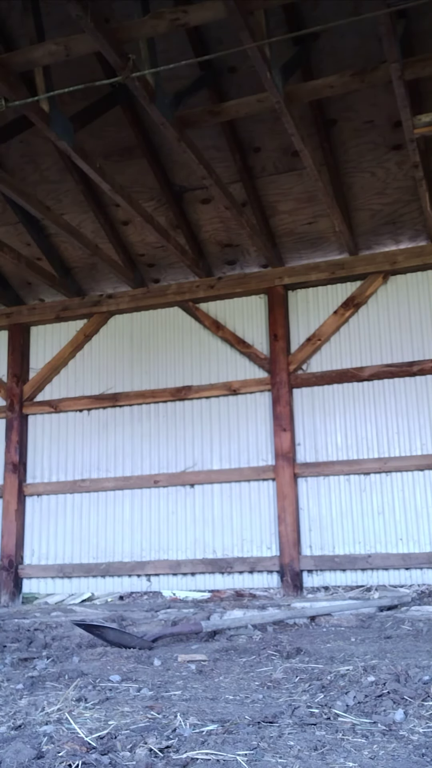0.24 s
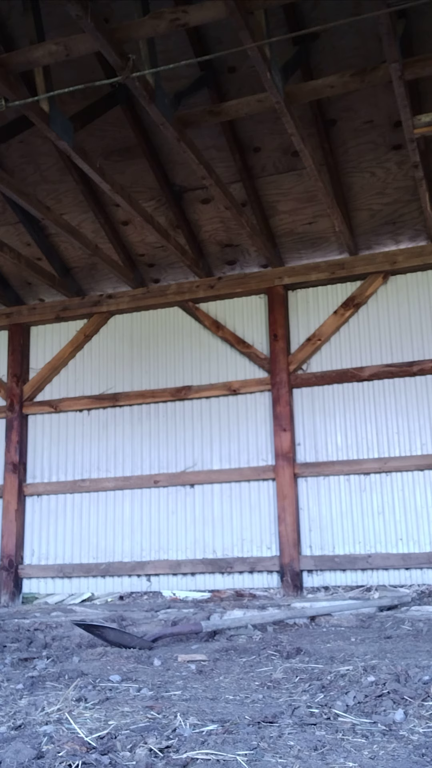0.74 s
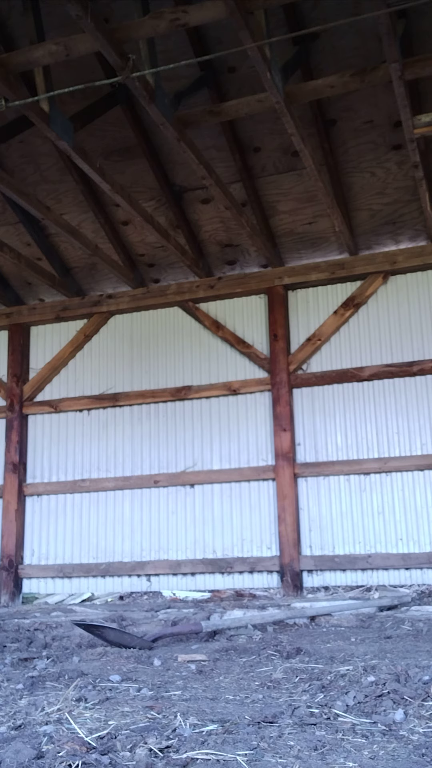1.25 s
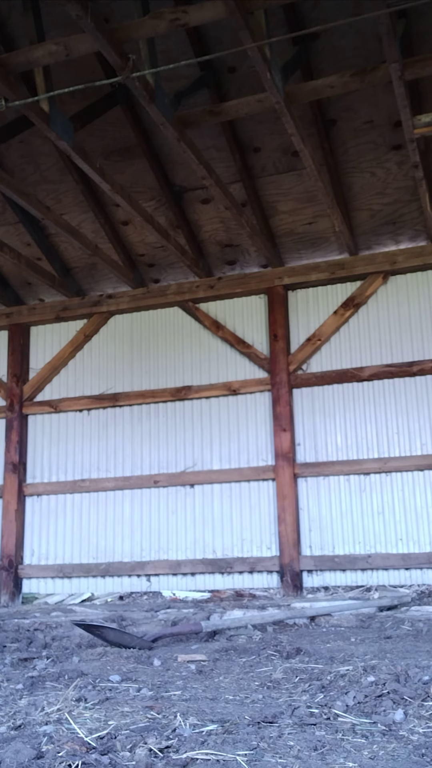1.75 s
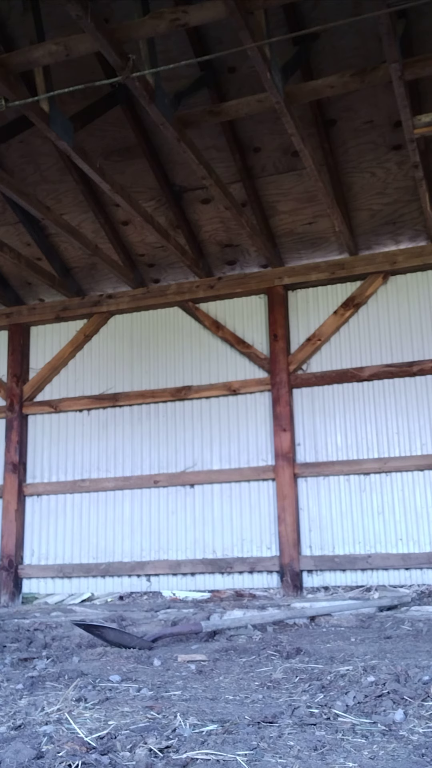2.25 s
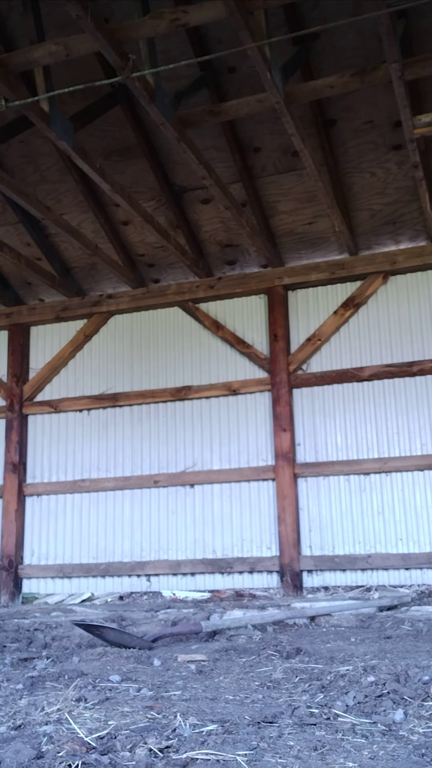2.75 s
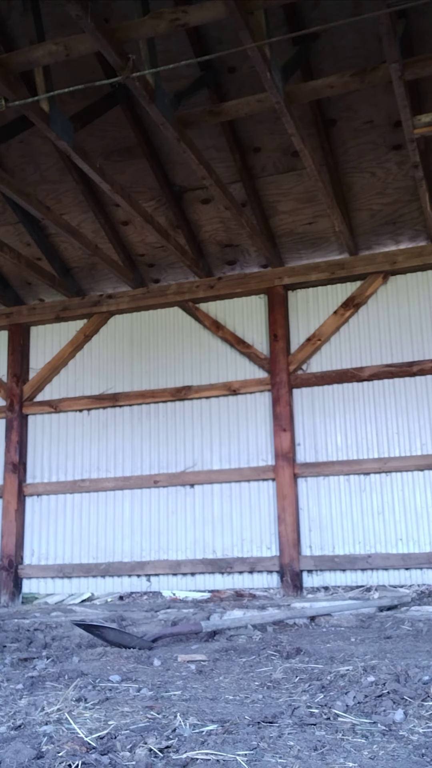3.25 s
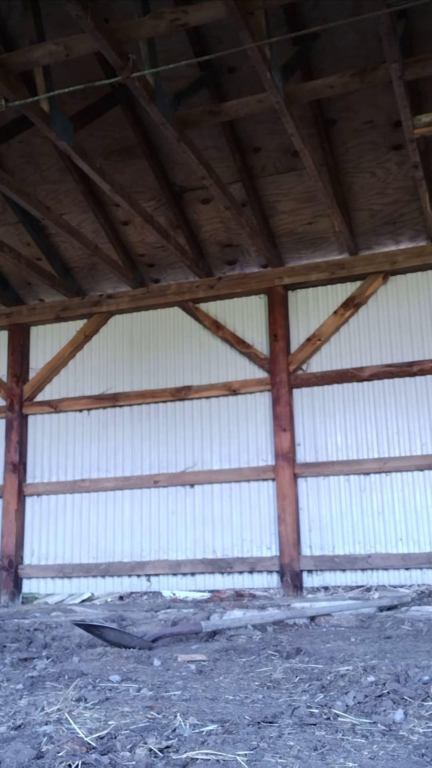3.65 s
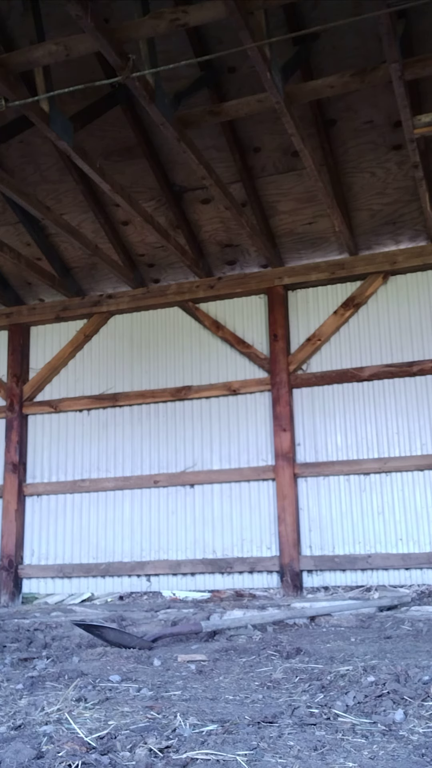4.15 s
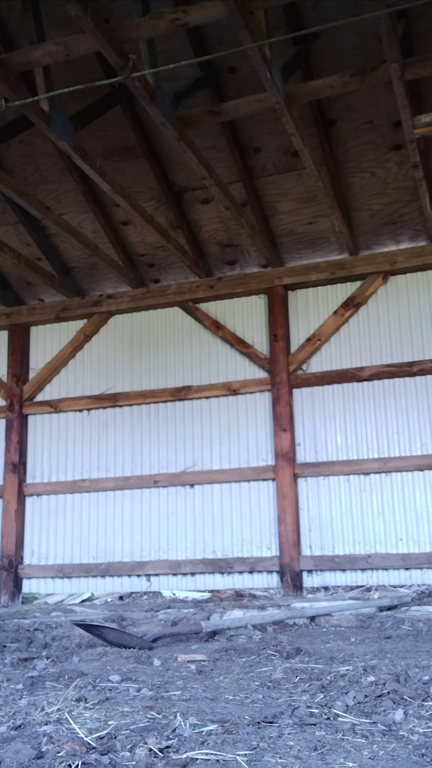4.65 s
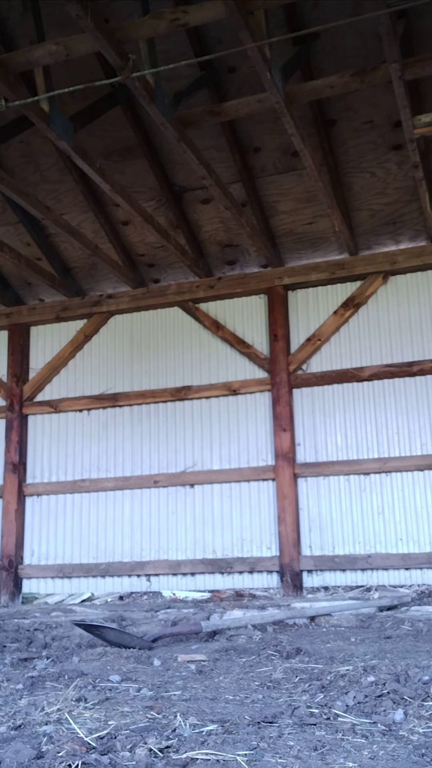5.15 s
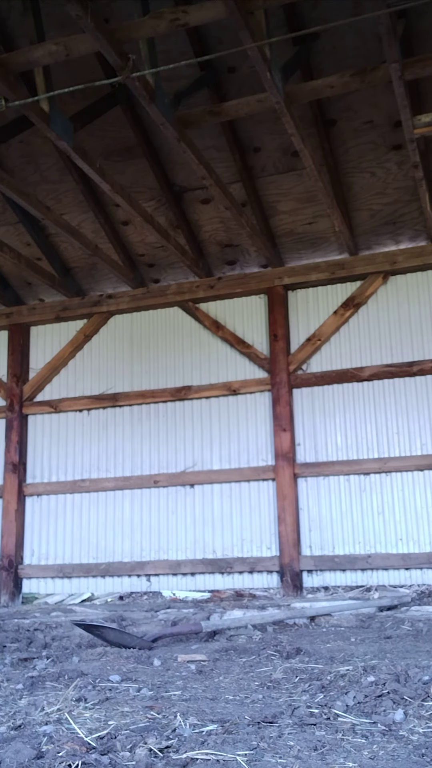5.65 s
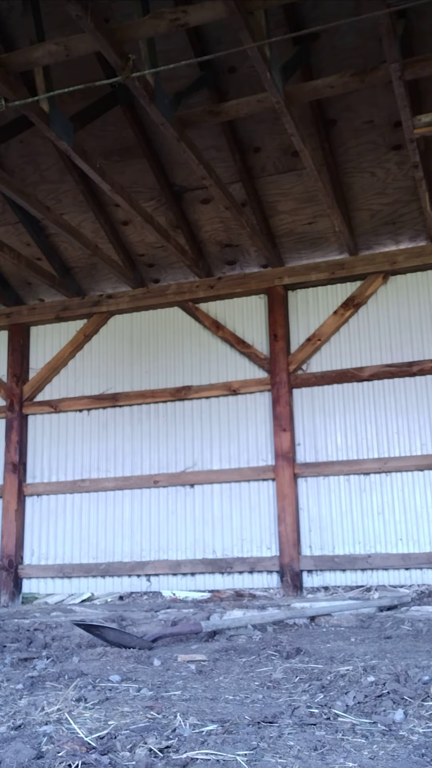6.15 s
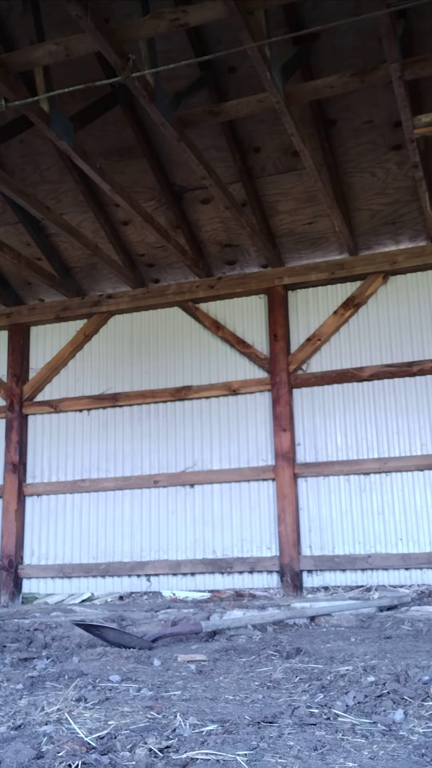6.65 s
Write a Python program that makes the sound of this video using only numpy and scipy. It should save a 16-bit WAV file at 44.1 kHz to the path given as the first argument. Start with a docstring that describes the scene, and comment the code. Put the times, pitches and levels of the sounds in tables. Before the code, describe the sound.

A quiet timber barn, heard through a close stereo microphone: very faint airy hiss, distant low rumble and a thin, steady insect trill. Clothing rustles softly at 0-0.4 s, with one faint high chirp near 0.15. At 1.2 s a hard, bright wooden clack hits the wall in a few quick contacts, with a low flex of the boards; at 1.43 s a duller, lower thud lands on dirt, with a faint fine rattle around it. Short woody echoes fade within about half a second. From 2 to 6.3 s a bird gives brief, gliding high chirps every 0.3-0.7 s, clearest around 4.6-5.5. Sleeve rustles are strongest near 4 and 4.7 s; tiny dry ticks snap at 3.2-4.2 and 6.2-6.6, and faint squeaks come at 4.55 and 5.1. At 6.6 s a heavier, louder, resonant bang shakes the boards, its reverberation cut off at 6.9.

```python
"""Knocks in a timber barn

A hard piece of wood clacks against the wall of a quiet barn and thuds to the dirt floor; about five
seconds later a heavier knock shakes the boards. Each blow is a few quick contacts that drive a broad
wooden body and ringing modes, with echoes off the near wall and roof made from fading noise.
A bird chirps with gliding tones, clothing rustles as shaped noise, and ticks, squeaks, a fine rattle,
insects, hissing air and a distant rumble fill in the quiet."""
import sys
import numpy as np
from scipy import signal
from scipy.fft import rfft, irfft, next_fast_len
from scipy.io import wavfile
from scipy.ndimage import uniform_filter1d, minimum_filter1d

SR = 44100
rng = np.random.default_rng(int(sys.argv[2]) if len(sys.argv) > 2 else 0)


def materialize(psi):
    """Save the field psi as 16-bit PCM at rate SR to the path in sys.argv[1].

    A 1-D psi becomes a single channel; in a 2-D psi each row is a channel.
    """
    bounded = np.clip(np.atleast_2d(psi).T, -1, 1)
    quanta = np.round(bounded * 32767).astype(np.int16)
    wavfile.write(sys.argv[1], SR, quanta)


N = 303849

# Still air and distant rumble, colour of the noise: (f/Hz, weight/dB)
AIR_COLOUR = [(30, -11), (250, -0.5), (500, 10.5), (1050, 11), (1600, 6.5), (3200, 1), (5200, 1),
              (6800, -2.5), (8600, -5.5), (9500, -7), (12000, -6.5), (15500, -12)]
RUMBLE_COLOUR = [(30, -21.5), (48, -8), (70, -4.5), (100, 0), (135, -1.5), (210, -7), (300, -15),
                 (500, -26.5), (1500, -58)]
# Distant rumble over time: (t/s, level/dB)
RUMBLE_LEVEL = [(.9, -71), (1.9, -64.5), (3.2, -69.5), (5.3, -67), (6.89, -61)]
# Insects trilling far off: (centre f/Hz, width/Hz, level/dB)
INSECTS = [(5200, 600, -85.5), (8096, 200, -91.5), (8300, 310, -100), (8660, 300, -89)]
# Two faint squeaks: (t/s, length/s, level/dB), and the tones in each: (f/Hz, level/dB)
SQUEAKS = [(4.552, 0.12, -72.5), (5.117, 0.039, -72)]
SQUEAK_TONES = [(1390, 1.5), (1840, 4.5), (2380, -8), (2630, 5)]
# Bird chirps: (t/s of the flick, level/dB before random variation, base pitch f/Hz)
CHIRPS = [(0.157, -63, 4400), (2.039, -68.5, 4430), (2.331, -63, 4470), (2.694, -64, 4510),
          (3.263, -63, 4550), (3.61, -60.5, 4565), (4.193, -63.5, 4510), (4.585, -56, 4500),
          (4.913, -57.5, 4480), (5.218, -57.5, 4550), (5.543, -58, 4520), (6.29, -65, 4406)]
# Rustling cloth, colour of the noise: (f/Hz, weight/dB)
CLOTH_COLOUR = [(100, -21), (300, 4), (700, 2), (1400, -2), (2300, 1), (4000, 2.5), (6500, -1),
                (9500, -0.5), (11500, -13), (14000, -3), (16000, -16)]
# Light rubbing between the strokes: (t/s, level/dB)
RUB_LEVEL = [(0, -74.5), (1.1, -76.5), (2.3, -87), (3.1, -82.5), (4.4, -70.5), (5.6, -69), (6.2, -74)]
# Strokes of the sleeve: (middle t/s, length/s, level/dB, treble against the rest/dB)
STROKES = [(0.073, 0.51, -69.5, 2.5), (0.28, 0.15, -65.5, 11), (0.981, 0.1, -65, 6),
           (2.765, 0.17, -77.5, 2), (3.262, 0.086, -72, 5), (3.517, 0.32, -70, 4.5),
           (3.935, 0.27, -58.5, 8), (4.085, 0.097, -59, 7), (4.24, 0.11, -70.5, -8),
           (4.583, 0.097, -68.5, -10), (4.69, 0.11, -58, -1), (4.905, 0.14, -65, -1.5),
           (5.157, 0.15, -66.5, 2), (5.298, 0.033, -65.5, 1), (5.61, 0.15, -67, 0), (5.825, 0.21, -62, 6.5),
           (6.279, 0.087, -64, 4.5), (6.506, 0.25, -73.5, 16)]
# Small ticks close by: (t/s, level/dB, f/Hz, time to fade by 60 dB/s, left minus right/dB at the source)
TICKS = [(1.246, -29, 6400, 0.012, 23), (3.2182, -57, 4350, 0.016, 8), (3.4187, -53, 5800, 0.018, 5.5),
         (3.5825, -42.5, 4950, 0.0065, 4.5), (3.892, -37, 8700, 0.012, 13.5),
         (3.8943, -38, 3730, 0.0082, 5), (4.179, -42, 4350, 0.0048, -4), (6.242, -54, 8000, 0.0076, 11),
         (6.5702, -52, 6940, .008, 3)]
# The wall flexes after the clack: (t/s, level/dB, f/Hz)
FLEX = [(1.22, -27, 88.3), (1.373, -33, 73)]
# Contacts of each blow: (t/s, relative force/dB, f/Hz above which the contact is too soft to excite)
CLACK_CONTACTS = [(1.2012, 4, 6860), (1.2035, -4.5, 2892), (1.2385, -1.5, 1400)]
THUD_CONTACTS = [(1.4345, 2, 2240), (1.4470, -3.5, 2320), (1.478, -10.5, 2860)]
BANG_CONTACTS = [(6.5968, 2.2, 1770), (6.6050, 5.6, 6000)]
# Colour of each blow's wooden body: (f/Hz, weight/dB)
CLACK_COLOUR = [(25, -24), (55, 3.5), (90, 5.5), (190, 8.5), (400, -3.5), (680, 4), (900, -4), (1500, 0),
                (2800, -4), (3200, -15.5), (5200, -22), (7000, -19.5), (11000, -44.5), (15500, -40.5)]
THUD_COLOUR = [(25, -28.5), (60, -1), (170, -0.5), (320, -1.5), (420, -7), (680, -3.5), (900, -18),
               (1500, -19.5), (2100, -31), (3200, -32.5), (4200, -42), (7000, -45), (12000, -62)]
BANG_COLOUR = [(25, -20), (60, -11), (88, 2), (160, 2), (235, 11), (400, -0.5), (750, 1.5), (1500, -0.5),
               (2750, -5), (3400, -15.5), (5200, -23), (7200, -37), (10000, -51.5), (15500, -57)]
# Ringing modes of the wood in each blow: (f/Hz, relative level/dB, time to fade by 60 dB/s)
CLACK_MODES = [(107, -4.5, 0.47), (500.8, -12, .28), (588, -9.5, 0.24), (661, -11, .32), (915, -14.5, 0.23),
               (1062, -5.5, 0.19), (1120, 3.5, 0.34), (1172, 0, 0.23), (1421, -9.5, 0.17), (1773, -6, 0.28),
               (2070, -14.5, 0.18), (2415, -4, .31), (2570, -4.5, 0.21), (2630, -2, 0.3)]
THUD_MODES = [(80, -8.5, 1), (190.3, 0, 0.34), (248.6, -3, 0.41), (326.8, 2, .24), (503.7, 0.5, 0.27),
              (663.4, -8.5, 0.1), (1186, -12.5, 0.35), (1563, -7, 0.29)]
BANG_MODES = [(86.7, -14, 0.82), (212, 5, 0.48), (322.4, 0.5, 0.46), (406.5, -5.5, 0.64), (452, -1, 0.52),
              (503, -2, 0.56), (697, 9, 0.3), (760, 2.5, .33), (957, -2.5, 0.34), (1038, 0, 0.2),
              (1270, 3.5, .42), (1532, 5, 0.15), (1767, 9, .3), (2670, 3.5, 0.36)]
# Fading of the barn's echoes, before each sound's own factor: (f/Hz, time to fade by 60 dB/s)
BARN_FADE = [(50, 1.0), (100, .8), (170, 0.38), (300, .47), (700, 0.44), (1500, .39), (3000, 0.43),
             (6000, 0.31), (14000, 0.19)]
# Sound from all around: (f/Hz, left-right likeness from 0 to 1) and (f/Hz, left ahead by/radians)
ECHO_LIKENESS = [(100, 1), (280, 0.79), (650, 1), (1200, 0.22), (2200, 0.13), (6000, 0.09)]
ECHO_LEAD = [(280, 0.05), (650, 0.27), (1200, 1.7), (2500, 0.22)]
# Echoes in a bunch, off the near wall and off the roof: (t/s after the blow, spread/s, level/dB)
REFLECTIONS = [(0.0108, 0.0027, -1), (.045, .011, -2)]
# The two microphone ports: (f/Hz, left ahead by/radians) and (f/Hz, left minus right/dB)
PORT_LEAD = [(80, 0.68), (250, 0.38), (650, 1.07), (1200, 0), (2500, 1.76), (8000, 1.65)]
PORT_BALANCE = [(40, 4), (110, 4.5), (230, 1.9), (600, 2), (1200, 6.1), (2500, 4), (7000, 8.4),
                (14000, 3.3)]

TIME = np.arange(N) / SR  # s
# Clock and frequencies for one short sound
SIZE = 45000  # samples
AGE = np.arange(SIZE) / SR  # s
HZ = np.fft.rfftfreq(SIZE, 1 / SR)

# The diffuse echoes build up from thin to full
THIN_DB, FULL_DB, BUILD_S = -16, 0, 0.051
# How uneven the echoes make a ringing mode
SWIRL = .35
# Lead note of a chirp: time before the flick, length, share of the base pitch, level
LEAD_S, LEAD_LENGTH_S, LEAD_PITCH, LEAD_DB = .08, 0.0082, .9, -6
# Whistle: start before the flick, share of pitch it scoops up, time of the scoop, level and fade
WHISTLE_S, SCOOP, SCOOP_S, WHISTLE_DB, WHISTLE_FADE_DB_PER_S = .047, 0.082, .004, 0.5, 336
# Flick: length, share of pitch it rises, share of pitch per second it then falls
FLICK_LENGTH_S, FLICK_RISE, FLICK_FALL_PER_S = 0.014, 0.048, 11


def amp(db):
    """Turns decibels into gain."""
    return 10 ** (np.asarray(db) / 20)


def unit(x):
    """Scales to an rms of 1."""
    return x / np.sqrt(np.mean(x ** 2) + 1e-30)


def read(points, hz):
    """Reads a table along a log-frequency axis."""
    f, value = np.transpose(points)
    return np.interp(np.log(hz + 1), np.log(f), value)


def split(db):
    """Left and right gains that differ by this many dB."""
    return amp(np.array([[.5], [-.5]]) * db)


def add(mix, s, sound):
    """Mixes a sound in at time s."""
    part = mix[..., max(round(s * SR), 0):][..., :sound.shape[-1]]
    part += sound[..., :part.shape[-1]]


def drift(size, count):
    """Random values of rms 1 that change over about count steps."""
    return unit(uniform_filter1d(rng.standard_normal(size), count))


def swell(t, length):
    """A smooth rise and fall around t = 0, above about half its height for this length."""
    return np.exp(-3 * (t / length) ** 2)


def causal(gain):
    """A spectrum with this gain whose sound rings only after its start."""
    log_gain = np.log(np.maximum(gain, 1e-6))
    circle = np.r_[log_gain, log_gain[-2:0:-1]]
    return np.exp(np.conj(signal.hilbert(circle)))[:len(gain)]


def diffuse(size):
    """Noise from all around: alike at both ports in the bass, mostly unrelated in the treble."""
    hz = np.fft.rfftfreq(size, 1 / SR)
    left, other = rfft(rng.standard_normal((2, size)))
    same = np.clip(read(ECHO_LIKENESS, hz), 0, 1)
    right = same * left + np.sqrt(1 - same ** 2) * other
    return irfft([left, right * np.exp(-1j * read(ECHO_LEAD, hz))], size)


def wash(colour):
    """Diffuse noise of a given colour, with an rms of 1."""
    size = next_fast_len(N, True)
    gain = amp(read(colour, np.fft.rfftfreq(size, 1 / SR)))
    return unit(irfft(rfft(diffuse(size)) * gain, size)[:, :N])


def echo_strength():
    """Echo strength apart from decay: two early bunches over a diffuse build-up."""
    strength = amp(THIN_DB + (FULL_DB - THIN_DB) * np.minimum(AGE / BUILD_S, 1))
    for s, spread, db in REFLECTIONS:
        strength = strength + amp(db) * np.exp(-((AGE - s) / spread) ** 2)
    return strength


def barn(wet_db, linger):
    """Spectrum of the direct path plus echoes off wall and roof, which die away band by band."""
    hz, t, bands = signal.stft(diffuse(SIZE), SR, nperseg=256)
    fade_time = linger * read(BARN_FADE, hz)[:, None]
    tail = signal.istft(bands * amp(-60 * t / fade_time), SR, nperseg=256)[1][:, :SIZE]
    tail *= echo_strength()
    paths = 1 + amp(wet_db) * rfft(tail) / np.linalg.norm(tail[0])
    # the many paths favour no broad band
    power = uniform_filter1d((abs(paths) ** 2).mean(0), size=55)
    return paths * causal(power ** -.5)


def background(air_db=-75):
    """Still air hisses faintly over a distant rumble that rises and dips, strongest near the end."""
    air = amp(air_db) * wash(AIR_COLOUR)
    rumble_level = amp(np.interp(TIME, *np.transpose(RUMBLE_LEVEL)))
    return air + rumble_level * wash(RUMBLE_COLOUR)


def insects():
    """Many far trills merge into narrow steady bands of noise."""
    size = next_fast_len(N, True)
    hz = np.fft.rfftfreq(size, 1 / SR)
    bands = 0
    for centre, width, db in INSECTS:
        bands = bands + amp(db) * unit(np.exp(-2 * ((hz - centre) / width) ** 2))
    return irfft(rfft(diffuse(size)) * bands, size)[:, :N]


def squeaks(waver=0.029):
    """Brief faint sets of tones waver together in pitch."""
    out = np.zeros((2, N))
    for s, length, db in SQUEAKS:
        t = AGE[AGE < length]
        clock = np.cumsum(1 + waver * drift(SIZE, count=150))[:len(t)] / SR
        tones = sum(amp(part_db) * np.sin(2 * np.pi * hz * clock) for hz, part_db in SQUEAK_TONES)
        add(out, s, amp(db) * np.sin(np.pi * t / length) * tones)
    return out


def bird(wet_db=-4, linger=1.1, waver=0.009, vary_db=3.5):
    """A lead note, then a whistle that scoops up, holds and ends in a falling flick, blurred by the barn."""
    out = np.zeros(N)
    t = np.arange(-.12, .05, 1 / SR)  # 0 at the flick
    after = np.maximum(t, 0)
    held = np.maximum(t + WHISTLE_S, 0)
    lead = amp(LEAD_DB) * swell(t + LEAD_S, LEAD_LENGTH_S)
    flick = swell(t, FLICK_LENGTH_S)
    scoop = np.exp(-held / SCOOP_S)
    whistle_level = amp(WHISTLE_DB - WHISTLE_FADE_DB_PER_S * held)
    whistle = (1 - scoop) * whistle_level * swell(after, FLICK_LENGTH_S)
    bend = swell(t, 1.2 * FLICK_LENGTH_S) * (FLICK_RISE - FLICK_FALL_PER_S * after)
    pitch = np.where(held > 0, 1 - SCOOP * scoop + bend, LEAD_PITCH)
    loudness = lead + whistle + flick
    for s, db, hz in CHIRPS:
        # no two chirps are quite alike in pitch or level
        turns = np.cumsum(hz * pitch * (1 + waver * drift(len(t), count=90))) / SR
        level = amp(db + vary_db * drift(len(t), count=800))
        add(out, s + t[0], loudness * level * np.sin(2 * np.pi * turns))
    return signal.oaconvolve(out[None], irfft(barn(wet_db, linger)), axes=1)[:, :N]


def cloth(grain_db=2.0, uneven_db=-0.5, pan_db=3, crisp_hz=8000):
    """Fibres catch and slip in small clumps; sleeve strokes swell and fade, some crisper than others."""
    clumps_db = grain_db * drift(N, count=130) + uneven_db * drift(N, count=1500)
    rub = unit(wash(CLOTH_COLOUR) * amp(clumps_db))
    fizz = signal.filtfilt(*signal.butter(2, crisp_hz, "high", fs=SR), rub)
    body_power = fizz_power = amp(np.interp(TIME, *np.transpose(RUB_LEVEL))) ** 2
    for s, length, db, treble_db in STROKES:
        motion = swell(TIME - s, length)
        body_power = body_power + (motion * amp(db - treble_db / 2)) ** 2
        fizz_power = fizz_power + (motion * amp(db + treble_db / 2)) ** 2
    rustle = fizz * np.sqrt(fizz_power) + (rub - fizz) * np.sqrt(body_power)
    return rustle * split(pan_db)


def ticks(octaves=0.44, echo_db=-17):
    """Grit and straw snap: tiny fading bursts of noise around one pitch, with a faint echo."""
    out = np.zeros((2, N))
    for s, db, hz, t60, pan_db in TICKS:
        burst = rng.standard_normal((2, SIZE)) * amp(-60 * AGE / t60)
        resonance = causal(1 / (1 + (np.log2((HZ + 1) / hz) / octaves) ** 2))
        snap = irfft(rfft(burst) * resonance)
        add(out, s, amp(db) * split(pan_db) * snap / abs(snap).max())
    return signal.oaconvolve(out, irfft(barn(echo_db, linger=0.74)), axes=1)[:, :N]


def rattle(start=1.343, rise=0.063, level_db=-70, hz=6800, width_hz=900, grain_db=4):
    """A fine high rattle, grainy noise in one band, swells and lingers around the thud."""
    size = next_fast_len(N, True)
    band = 1 / (1 + ((np.fft.rfftfreq(size, 1 / SR) - hz) / width_hz) ** 2)
    rough = diffuse(size) * amp(grain_db * drift(size, count=200))
    grains = irfft(rfft(rough) * band, size)[:, :N]
    age = np.maximum(TIME - start, 0) / rise
    return amp(level_db) * unit(grains) * age * np.exp(1 - age)


def wall_flex(rise_s=0.0037):
    """The wall swings slowly for a couple of cycles, a low tone that quickly dies."""
    out = np.zeros((2, N))
    swing = AGE / rise_s * np.exp(1 - AGE / rise_s)
    for s, db, hz in FLEX:
        add(out, s, amp(db) * swing * np.sin(2 * np.pi * hz * AGE))
    return out


def contact(s, db, hz, scatter):
    """Spectrum of one soft contact; the board lets each frequency out after its own short delay."""
    delay = s + scatter * (1 + np.tanh(drift(len(HZ), count=350)))  # s
    softness = causal((1 + (HZ / hz) ** 8) ** -.5)
    # adding up the delays along frequency gives the phase
    return amp(db) * softness * np.exp(-2j * np.pi * np.cumsum(delay) * HZ[1])


def ringing(modes, hold, attack=.0015):
    """Modes of the wood, held up by the first echoes and made uneven by the later ones."""
    ring = np.zeros((2, SIZE))
    echoes = SWIRL * (1 - np.exp(-AGE / hold))
    for hz, db, t60 in modes:
        apart = read(ECHO_LEAD, hz) * np.array([[.5], [-.5]])
        fade_db = -60 * np.maximum(AGE - hold, 0) / t60
        size = amp(db + fade_db) * np.exp(echoes * drift(SIZE, count=900) - echoes ** 2)
        blur = max(.5, (hz / 3000) ** 2)  # short waves blur most
        phase = 2 * np.pi * hz * (AGE - attack) + blur * echoes * drift(SIZE, count=900)
        ring += size * np.sin(phase + apart + rng.uniform(-2, 2))
    return ring * (1 - np.exp(-AGE / attack))


def knock(contacts, colour, modes, body_db, ring_db, hold, scatter, wet_db, linger, bass_pan_db):
    """Quick contacts drive a broad wooden body, heard through the barn, and a set of ringing modes."""
    start = contacts[0][0]
    force = sum(contact(s - start, db, hz, scatter) for s, db, hz in contacts)
    # the contacts share one blow's energy, so the wood alone sets its broad colour
    energy = uniform_filter1d(abs(force) ** 2, size=100)
    blow = force * causal((energy + .02 * energy.mean()) ** -.5)
    wood = causal(amp(body_db + read(colour, HZ)))
    body = irfft(blow * wood * barn(wet_db, linger))
    # the barn's standing waves favour one port in the bass
    lean = split(bass_pan_db / (1 + (HZ / 600) ** 2))
    sound = irfft(lean * rfft(body + amp(ring_db) * ringing(modes, hold)))
    # smooth start and end
    edges = np.interp(AGE, [0, .001, .5, AGE[-1]], [0, 1, 1, 0])
    out = np.zeros((2, N))
    add(out, start, sound * np.sin(np.pi / 2 * edges) ** 2)
    return out


def scene():
    """Three blows over the quiet of the barn; hold in s, scatter in s, linger a factor on the fading."""
    clack = knock(CLACK_CONTACTS, CLACK_COLOUR, CLACK_MODES, body_db=20.0, ring_db=-26.0, hold=0.04,
                  scatter=0.0021, wet_db=-1, linger=0.78, bass_pan_db=-3.5)
    thud = knock(THUD_CONTACTS, THUD_COLOUR, THUD_MODES, body_db=20.5, ring_db=-35, hold=.025,
                 scatter=0.0018, wet_db=-2, linger=0.76, bass_pan_db=-3)
    bang = knock(BANG_CONTACTS, BANG_COLOUR, BANG_MODES, body_db=31.0, ring_db=-30.5, hold=0.045,
                 scatter=0.002096, wet_db=1.5, linger=0.85, bass_pan_db=-5.0)
    blows = clack + thud + bang + wall_flex() + rattle()
    return blows + bird() + insects() + squeaks() + ticks() + cloth() + background()


def record(dry):
    """Two microphone ports of unlike colour, a low cut, a quick peak limiter, then a treble limit."""
    size = next_fast_len(N + SIZE, True)
    hz = np.fft.rfftfreq(size, 1 / SR)
    # the left port gets half the difference, the right port its inverse
    half = amp(read(PORT_BALANCE, hz) / 2) * np.exp(.5j * read(PORT_LEAD, hz))
    heard = irfft(rfft(dry, size) * np.array([half, 1 / half]), size)[:, :N]
    heard = signal.sosfilt(signal.butter(6, 38, "high", fs=SR, output="sos"), heard)
    headroom = minimum_filter1d(1 / np.maximum(abs(heard).max(0), 1), size=161)
    heard = heard * uniform_filter1d(headroom, size=161)
    treble_limit = signal.firwin(511, 15950, window=("kaiser", 9), fs=SR)  # cutoff in Hz
    return signal.oaconvolve(heard, treble_limit[None], "same")


dry = scene()
out = record(dry)
materialize(out)
```